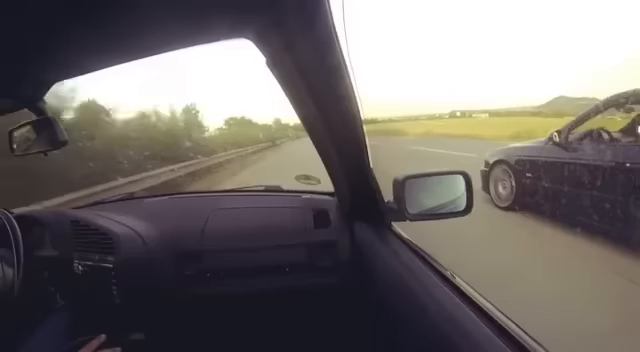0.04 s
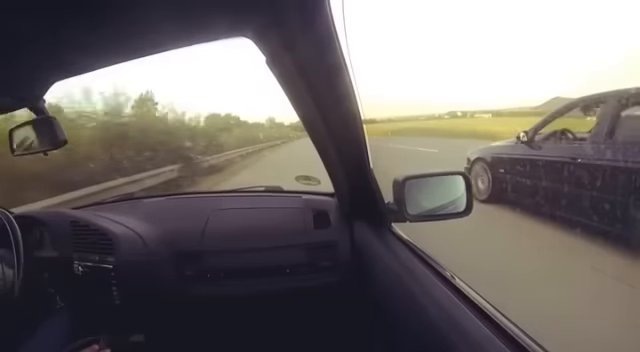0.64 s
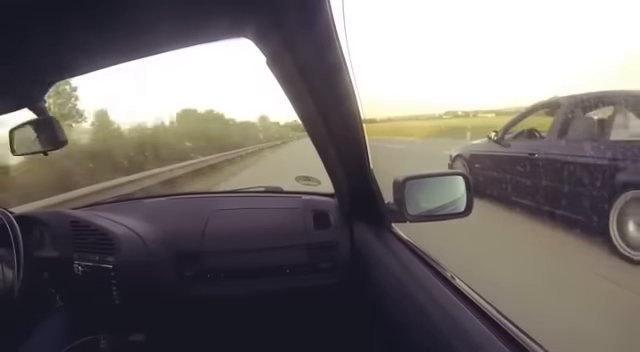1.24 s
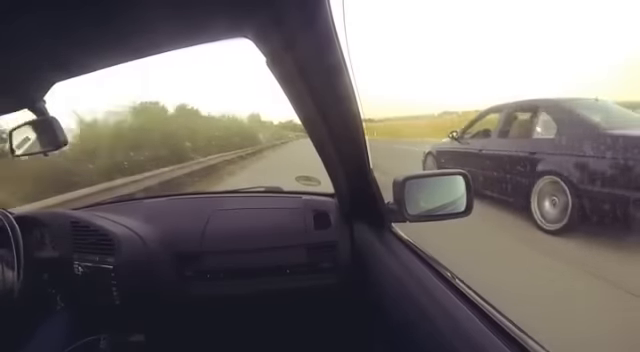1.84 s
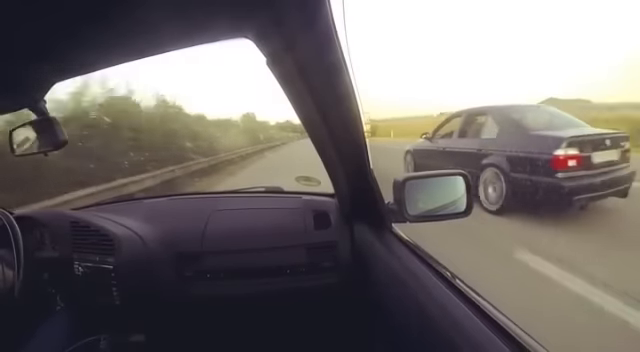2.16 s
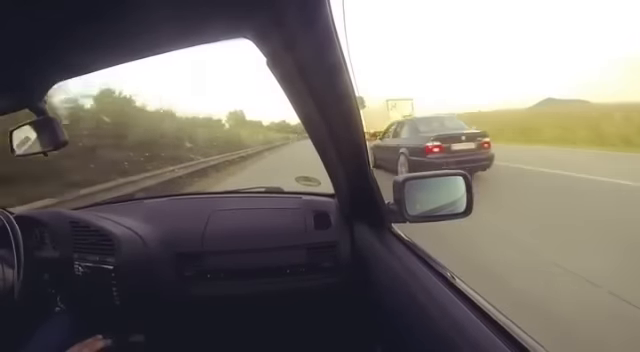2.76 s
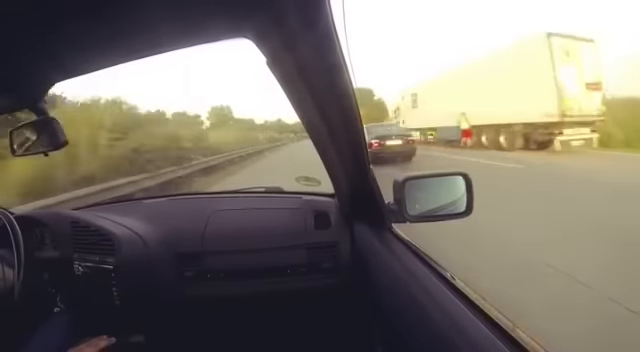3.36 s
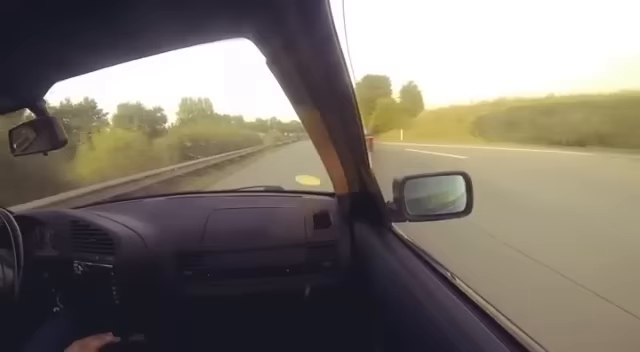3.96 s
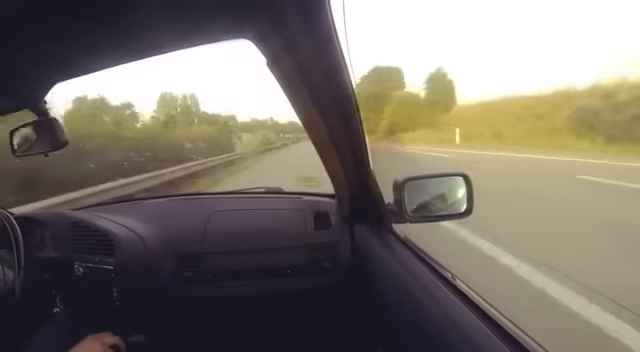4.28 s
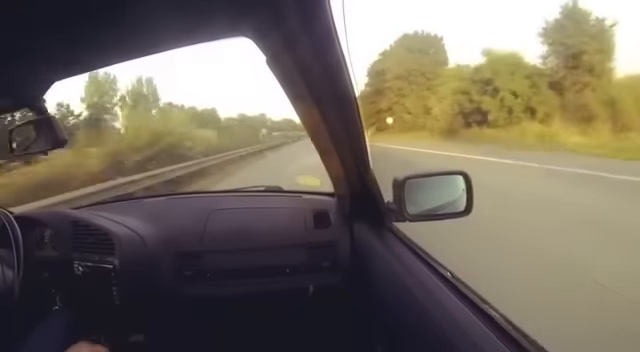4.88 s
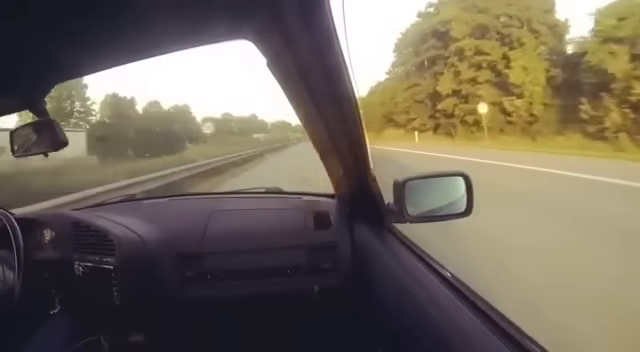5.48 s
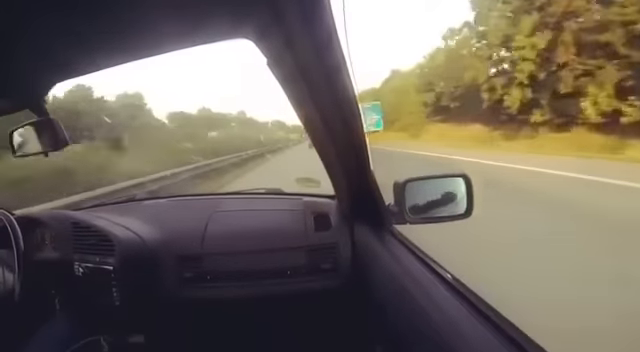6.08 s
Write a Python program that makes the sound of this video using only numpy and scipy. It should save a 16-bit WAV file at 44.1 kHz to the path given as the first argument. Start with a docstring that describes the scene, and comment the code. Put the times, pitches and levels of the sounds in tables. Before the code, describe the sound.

From the start, air throbs deeply through the open side window of a car at highway speed, with rushing wind, road rumble and a faint engine drone, all heard from the passenger seat. At about 0.7 seconds a V8 car in the next lane blips its throttle, then revs again at 1.3 as it changes down. From 1.7 it accelerates hard, its intake booming and rasping. It passes at around 2.5, and the sound turns into a howling, crackling exhaust, loudest near 3 seconds, climbing in pitch as it draws away. At about 4.5 it changes up with a dull pop, pulls once more until 5, then coasts as a distant hum. From 4.3 loose trim ticks lightly inside the cabin. Dull jolts of air thump near 0.4, 1.1, 5.3 and 5.7, and wind and rumble carry on to the end at about 6 seconds.

```python
"""Air throbs through the open side window of a car at highway speed, over road rumble and rushing wind.
A V8 in the next lane blips its throttle, changes down and pulls past: first its intake booms and rasps,
then its exhaust howls and crackles. Both are firing pulses and rough gas flow ringing in hollow spaces.
Far ahead it changes up, pulls once more and coasts, while loose trim ticks inside our car."""
import sys
import numpy as np
from scipy import signal
from scipy.fft import rfft, irfft, next_fast_len
from scipy.io import wavfile
from scipy.ndimage import uniform_filter1d

SR = 44100
rng = np.random.default_rng(int(sys.argv[2]) if len(sys.argv) > 2 else 0)


def put_to_file(sound):
    """Save the sound as 16-bit audio at rate SR, in the file named by the first command-line argument."""
    columns = np.atleast_2d(sound).T  # one column per channel
    safe = np.clip(columns, -1, 1)
    whole_steps = np.round(safe * 32767)
    wavfile.write(sys.argv[1], SR, whole_steps.astype(np.int16))


N = 269892
TIME = np.arange(N) / SR
FFT_SIZE = next_fast_len(N, True)
BIN_HZ = np.maximum(np.fft.rfftfreq(FFT_SIZE, 1 / SR), 1)
PAST_S = 2.46   # the V8's tail comes level with our window


def from_db(db):
    """Turn decibels into a gain to multiply by."""
    return 10 ** (np.asarray(db) / 20)


def rms_one(x):
    """Scale a signal so that its average level (rms) is 1."""
    return x / np.sqrt(np.mean(x ** 2) + 1e-20)


def in_time(rows):
    """Join (time, value) points with straight lines, giving a value for every sample."""
    return np.interp(TIME, *np.transpose(rows))


def turns_of(hz):
    """Count the cycles completed so far."""
    return np.cumsum(hz) / SR


def coloured(x, gain):
    """Give each frequency its own gain, then set the average level to 1."""
    return rms_one(irfft(rfft(x, FFT_SIZE) * gain, FFT_SIZE)[:N])


def resonant(x, modes):
    """Make a signal ring in narrow bands of pitch, called modes or resonances."""
    power = sum(from_db(db) ** 2 / (1 + ((BIN_HZ - hz) / (width / 2)) ** 2 / 2) ** 3
                for hz, width, db in modes)
    return coloured(x, np.sqrt(power))


def shaped(x, spectrum):
    """Filter with a smooth tone curve; nothing passes beyond its ends."""
    hz, db = np.transpose(spectrum)
    return coloured(x, from_db(np.interp(np.log(BIN_HZ), np.log(hz), db, left=-np.inf, right=-np.inf)))


def noise():
    """White noise: an even hiss."""
    return rng.standard_normal(N)


def drift(hz):
    """A random wander of typical size 1, mostly slower than hz."""
    return coloured(noise(), 1 / (1 + (BIN_HZ / hz) ** 2))


def evened(x):
    """Hold the short-term level at 1."""
    power = uniform_filter1d(uniform_filter1d(x ** 2, size=2400), size=2400)
    return x / np.sqrt(power + 1e-12)


def held(start_s, end_s, attack_s, release_s):
    """Rise to 1 from start_s, hold, and fall to 0 from end_s."""
    return np.clip(np.minimum((TIME - start_s) / attack_s, 1 - (TIME - end_s) / release_s), 0, 1)


def swell(centre_s, width_s):
    """A bell-shaped rise and fall of height 1."""
    return np.exp(-np.minimum(((TIME - centre_s) / width_s) ** 2, 50))


def knocks(events, spectrum, width_s, level_db):
    """Each knock is a brief, sharply peaked burst of filtered noise."""
    envelope = sum(from_db(db + level_db - 8.7 * np.minimum(np.abs(TIME - s - width_s) / width_s, 20))
                   for s, db in events)
    return envelope * shaped(noise(), spectrum)


def window_air():
    """The cabin breathes through the window like a blown bottle, and the wind flutters in step."""
    # how fast the air pumps in and out: (time [s], rate [Hz])
    throb_rate = [(0, 18.5), (1.3, 18.5), (2.8, 17.5), (3.4, 17), (4.4, 17.5), (5, 20), (6.12, 15.5)]
    # the throb, weaker while the other car is near: (time [s], relative level [dB])
    throb_level = [(0, -17.3), (1.25, -17.5), (1.85, -22.5), (2.7, -22), (3.6, -20), (4.1, -16.8),
                   (6.12, -17.6)]
    # rushing wind, with a lull: (time [s], relative level [dB])
    wind_level = [(0.09, -45), (.3, -42.5), (1.2, -42.3), (4.98, -44), (5.08, -47), (5.2, -44.5),
                  (5.28, -44.5), (5.34, -48.5), (5.48, -50), (5.62, -43.5), (5.8, -43.2), (6.12, -48.8)]
    # hollow resonances of the microphone's housing that colour the wind:
    # (pitch [Hz], width [Hz], relative level [dB])
    housing_modes = [(330.4, 143, -0.5), (413, 57, -1), (590, 80, -14), (600, 400, -14.5), (985, 180, -5.5),
                     (1400, 228, -10.5), (1550, 190, -5.5), (2276, 480, -18.5), (2986, 940, -25.3),
                     (4230, 600, -36.5), (4980, 590, -40), (6370, 1300, -46.5), (8050, 1600, -49),
                     (10400, 1900, -52)]
    swing = np.sin(2 * np.pi * turns_of(in_time(throb_rate) * (1 + .013 * drift(4))))
    throb = from_db(in_time(throb_level) + 4.5) * swing
    flutter_db = .72 * swing + 1.6 * drift(18)
    wind = from_db(in_time(wind_level) + 6.5 + flutter_db) * resonant(noise(), housing_modes)
    return throb + wind


def rolling(level, bumps, spectrum):
    """Low noise that wavers with the uneven road and swells at each bump."""
    surface = from_db(in_time(level) + 1.8 * drift(7))
    power = surface ** 2 + sum(from_db(db) ** 2 * swell(s, width_s=.06) for s, db in bumps)
    return np.sqrt(power) * evened(shaped(noise(), spectrum))


def road():
    """The road makes our car's body shudder and its cabin rumble."""
    # body shudder: (time [s], level [dB])
    shudder_level = [(0, -28), (1.1, -29), (3.4, -23.5), (4.7, -31), (6.12, -28)]
    # its very deep tone: (frequency [Hz], relative level [dB])
    shudder_tone = [(12, -20), (22, -1), (30, 1.5), (42, -2.5), (50, -10), (65, -31)]
    # cabin rumble, easing on smoother road: (time [s], level [dB])
    rumble_level = [(0, -30), (1.1, -26.5), (3.0, -27), (3.25, -29.5), (4.4, -29.5), (5.1, -31.5),
                    (6.12, -30)]
    # its low tone: (frequency [Hz], relative level [dB])
    rumble_tone = [(42, -18.5), (54, -5.5), (66, 4), (76, -4), (86, -19), (105, -15.5), (150, -24),
                   (210, -29), (300, -34.5), (600, -69)]
    # bumps in the road: (time [s], shudder [dB], rumble [dB])
    bumps = [(.44, -23, -24), (1.78, -23, -23), (2.62, -20, -27), (2.8, -32, -18.5), (3.05, -20, -25),
             (3.6, -21, -27), (5.05, -40, -29), (5.33, -18.5, -25.5), (5.7, -25, -26)]
    shudder = rolling(shudder_level, [(s, db) for s, db, _ in bumps], shudder_tone)
    rumble = rolling(rumble_level, [(s, db) for s, _, db in bumps], rumble_tone)
    return shudder + rumble


def own_engine():
    """Our own engine drones on one low, slowly moving note."""
    # the drone: (time [s], pitch [Hz], level [dB])
    drone = [(0, 132.7, -62.5), (2.4, 145.5, -45), (3, 148.3, -42), (4.7, 155.4, -41), (5, 157.9, -54),
             (6.12, 154.9, -47)]
    pitch = in_time([(s, hz) for s, hz, _ in drone])
    level_db = in_time([(s, db) for s, _, db in drone])
    return from_db(level_db) * np.sin(2 * np.pi * turns_of(pitch))


def electrical_whine(hz=10645):
    """A faint, very high tone that wavers in level."""
    return from_db(-79.5 + 2 * drift(3)) * np.sin(2 * np.pi * hz * TIME)


def tyres(fade_s=1.5):
    """The other car's tyres hiss beside us and fade once it is past."""
    # tyre hiss: (frequency [Hz], relative level [dB])
    tone = [(2000, -6), (3100, 0), (3700, -8), (4300, -3), (5200, -6), (6000, -12), (8200, -15),
            (12000, -28)]
    return from_db(-59.5) * np.clip(1 - (TIME - PAST_S) / fade_s, 0, 1) * shaped(noise(), tone)


def thumps():
    """Dull thumps: jolts of air, and one exhaust pop at the gear change."""
    # the thumps, with the pop at 4.474 s: (time [s], relative peak [dB])
    events = [(0.354, -23.5), (0.593, -33), (1.081, -24), (4.474, -29), (5.296, -17.5), (5.363, -20),
              (5.388, -31), (5.69, -25), (5.722, -22)]
    # their dull tone: (frequency [Hz], relative level [dB])
    tone = [(40, -10), (70, 0), (130, -2.5), (220, -16), (330, -3), (450, -20), (800, -37)]
    return knocks(events, tone, width_s=.0054, level_db=-3.5)


def firing(turns, spread, scatter_db=3, count=200):
    """Pressure from eight uneven cylinders; a spread under 1 bunches it into one beat a cycle."""
    # Orders are tones at whole multiples of the engine's cycle rate; order 8 is the firing rate.
    # the cylinders' pattern: (order [per cycle], relative level [dB])
    order_levels = [(1, -2.5), (3, 4), (4, 3), (6, -4), (7, -2), (8, 7), (9, 2.5), (10, -2), (11, 3),
                    (12, 4), (13, -1.5), (14, 0.5), (15, -12), (16, 6), (17, 4.5), (18, 3), (19, -3),
                    (20, 1), (21, 3), (22, -0.5), (24, -3.5), (25, 4.5), (26, -9.5), (27, -10.5), (28, 0.5),
                    (29, -1), (30, -3), (32, -2), (34, 1), (38, -2)]
    orders = np.arange(count)
    listed, db = np.transpose(order_levels)
    chance_db = rng.normal(0, 1, count) * scatter_db * (orders > listed[-1])
    sizes = from_db(np.interp(orders, listed, db) + chance_db) * (orders > 0)
    lags = spread * rng.random(count)
    lags[8] = 0   # the firing rate stays in step with the crankshaft
    cycle = rms_one(irfft(sizes * np.exp(2j * np.pi * lags), 20 * count))
    return np.interp(turns % 1, np.arange(len(cycle)) / len(cycle), cycle)


def gas_flow(turns, rough_db, throb_db, spread=1):
    """Firing pulses, plus the noise of swirling gas that surges with each cycle and each firing."""
    surge = from_db(throb_db * (np.cos(2 * np.pi * turns) + np.cos(16 * np.pi * turns)))
    shifting = sum(drift(8) * firing(turns, spread=1) for _ in range(2))   # no two cycles fire alike
    pulses = rms_one(firing(turns, spread) + from_db(-13) * rms_one(shifting))
    return pulses + from_db(rough_db + 1.5) * rms_one(surge * noise())


def passing_gains(turn_s=.12, shadow_db=-22.5):
    """Each part of the V8 grows louder as the throttle opens and as that part turns to face us."""
    # throttle presses: (opens [s], lifts [s], rise [s], fall [s], boom, hiss and spray [dB],
    # rasp, snarl and whistle [dB], exhaust [dB])
    throttle = [(.68, .83, .1, .1, 1.5, 1, 3), (1.23, 1.5, .16, .17, -2, -1.5, 0),
                (1.65, 4.2, .1, .07, 0, 0, 0), (4.39, 4.49, .05, .07, -5, -3, -8.5),
                (4.71, 5.0, .09, .06, -12, 6, -4.5), (5.1, 5.28, .05, .05, -18, 1, -16)]
    # when each named part faces us: (from [s], until [s], relative level [dB], rise [dB/s],
    # fall [dB/s], step once past [dB], share of flares and flutter [factor])
    facing = { "boom": (1.45, 2.27, -19.5, 17, 37, 0, .4), "rasp": (1.78, 2.0, -21, 24, 14, -11, .5),
              "snarl": (2.1, 2.27, -21.7, 15, 36, -8, .4), "whistle": (1.45, 2.3, -43, 18, 6, 0, .9),
              "pipe": (2.55, 3.0, -26.2, 11.5, 5.3, 1.5, .25), "howl": (2.85, 3.05, -25, 8.5, 10, 7, .25),
              "blare": (2.7, 3.35, -32.2, 14, 5.5, 0, .6), "crackle": (2.5, 2.85, -38.7, 17, 10, 1.5, .7),
              "spit": (2.65, 2.85, -37, 11, 17, 2, 1.0), "sizzle": (2.55, 2.8, -46.8, 15, 18.5, 2.5, 1.2),
              "hiss": (1.95, 2.3, -51.5, 6, 6, -5.5, .5), "spray": (2.4, 2.6, -54.6, 8.5, 11, -2, .7), }
    # brief flares and dips in level: (time [s], half width [s], change at a share of 1 [dB])
    flares = [(1.78, .03, 2), (1.88, .04, -3), (2.66, .025, 2.5), (2.8, .025, 7.5), (3.07, .035, 4.5),
              (3.16, .055, -10), (3.27, .03, 4), (3.47, .04, -6), (3.84, .02, 6), (4.482, .012, 16)]
    presses = [(held(*row[:4]), *row[4:]) for row in throttle]
    airbox = sum(from_db(db) * opening ** .9 for opening, db, _, _ in presses)
    air = sum(from_db(db) * opening ** 1.5 for opening, db, _, _ in presses)
    front = sum(from_db(db) * opening ** 1.5 for opening, _, db, _ in presses)
    rear = sum(from_db(db) * opening ** 1.5 for opening, _, _, db in presses)
    drive = dict(boom=airbox, hiss=air, spray=air, rasp=front, snarl=front, whistle=front,
                 pipe=rear, howl=rear, blare=rear, crackle=rear, spit=rear, sizzle=rear)
    past = np.clip((TIME - PAST_S) / turn_s, 0, 1)
    lorry_db = 3.5 * swell(3.71, width_s=.16)   # the side of a lorry throws the sound back
    flare_db = sum(db * swell(s, width) for s, width, db in flares)
    gains = {}
    for part, (start, end, level_db, rise, fall, step_db, share) in facing.items():
        away_db = -rise * np.maximum(start - TIME, 0) - fall * np.maximum(TIME - end, 0)
        if part in ("boom", "rasp", "snarl"):   # still heard when the car's body hides the intake
            away_db = np.maximum(away_db, shadow_db)
        uneven_db = share * (flare_db + 1.1 * drift(16))
        gains[part] = drive[part] * from_db(level_db + away_db + step_db * past + lorry_db + uneven_db)
    return gains


def intake(turns, rough_db, gain):
    """Gulps of air make the air filter box boom and the throttles rasp, snarl and whistle."""
    # resonances of the box and the throttles: (pitch [Hz], width [Hz], relative level [dB])
    boom_modes = [(366, 56, 0.5), (296, 70, -7), (430, 71, -9.5), (140, 40, -25)]
    rasp_modes = [(1617, 118, 0), (1745, 115, -12), (930, 130, -17), (750, 80, -19)]
    snarl_modes = [(1465, 125, 0), (1290, 130, -15)]
    whistle_modes = [(2230, 230, 0)]
    box_flow = gas_flow(turns, rough_db - 6.5, throb_db=6)
    out = from_db(1.2) * gain["boom"] * evened(resonant(box_flow, boom_modes))
    gulps = gas_flow(turns, rough_db + 2, throb_db=.5)
    for part, modes in dict(rasp=rasp_modes, snarl=snarl_modes, whistle=whistle_modes).items():
        out += gain[part] * evened(resonant(gulps, modes))
    return out


def with_echo(x, echo_db, lag_s, growth):
    """An echo whose path grows as the car draws away makes the engine's tones swell and fade."""
    return x + from_db(echo_db) * np.interp(TIME - lag_s - growth * TIME, TIME, x)


def exhaust(turns, rough_db, gain):
    """Pulses ring the pipes into low notes, a howl and a blare; the outlets crackle, spit and sizzle."""
    # resonances of the pipes and outlets: (pitch [Hz], width [Hz], relative level [dB])
    pipe_modes = [(160.6, 106, -19.5), (322, 49.9, -3), (468.3, 36.5, -4), (543, 72, -10.5),
                  (610, 57, -1.5), (704, 30, -4)]
    howl_modes = [(770, 60, -9.5), (852, 117, 0), (925, 140, 3), (1058, 101, -2), (1190, 160, -19)]
    blare_modes = [(1413, 130, -1.5), (1555, 140, 0), (1827, 140, -19)]
    crackle_modes = [(2120, 90, -1), (2350, 130, 1), (2574, 120, -1)]
    spit_modes = [(2800, 150, -2), (2990, 140, 2.5), (3290, 190, 2.5)]
    sizzle_modes = [(3720, 300, -5), (4130, 300, -1), (4360, 300, 0), (5050, 380, -16)]
    pulses = gas_flow(turns, rough_db + 1, throb_db=4, spread=.62)
    pulses = with_echo(pulses, echo_db=-11, lag_s=.00389, growth=.001534)
    outlet = gas_flow(turns, rough_db + 6.5, throb_db=3.5)
    outlet = with_echo(outlet, echo_db=-4, lag_s=.003, growth=.0009)
    jet = gas_flow(turns, rough_db + 11.5, throb_db=3.5)
    fizz = gas_flow(turns, rough_db + 12, throb_db=-2)
    return (from_db(1.36) * gain["pipe"] * evened(resonant(pulses, pipe_modes))
            + from_db(-.9) * gain["howl"] * evened(resonant(pulses, howl_modes))
            + gain["blare"] * evened(resonant(outlet, blare_modes))
            + gain["crackle"] * evened(resonant(jet, crackle_modes))
            + gain["spit"] * evened(resonant(jet, spit_modes))
            + gain["sizzle"] * evened(resonant(fizz, sizzle_modes)))


def gas_hiss(jet, gain):
    """Fast gas hisses, with a finer, higher spray of noise on top."""
    # tone of the hiss and the spray: (frequency [Hz], relative level [dB])
    hiss_tone = [(1900, -13.5), (3900, -10), (5100, 0), (6200, -5), (7200, -16), (8500, -34)]
    spray_tone = [(6500, -14), (7500, -6), (8200, 0), (8800, -5), (9300, -8), (12000, -10.5),
                  (13000, -15.5), (14000, -11), (15500, -30.5)]
    hiss = from_db(1.9) * gain["hiss"] * evened(shaped(jet, hiss_tone))
    spray = from_db(-.4) * gain["spray"] * evened(shaped(jet, spray_tone))
    return hiss + spray


def frayed(turns):
    """Slightly unsteady timing roughens a clean engine tone."""
    return turns + .003 * drift(35)


def singing(turns, gain, floor_db=-9):
    """Single orders sing out as they meet a resonance; return them and the gain each part has left."""
    # the sung notes: (part [name], order [per cycle], starts [s], fades [s], level [dB])
    notes = [("boom", 8, .73, .8, -30.5), ("pipe", 16, .73, .78, -37), ("boom", 8, 1.36, 1.46, -24),
             ("snarl", 31, 1.8, 1.93, -26), ("rasp", 35, 1.82, 1.93, -21), ("snarl", 30, 2.03, 2.2, -24),
             ("howl", 16, 2.14, 2.24, -26), ("howl", 20, 2.36, 2.76, -18.5), ("blare", 27, 2.3, 2.55, -35),
             ("blare", 28, 2.92, 3.1, -29), ("blare", 30, 3.0, 3.08, -33), ("blare", 30, 3.25, 3.4, -33),
             ("crackle", 45, 2.92, 3.03, -37), ("spit", 61, 2.9, 3.0, -39), ("blare", 28, 3.6, 3.69, -29),
             ("blare", 25, 3.95, 4.12, -38), ("rasp", 36, 4.75, 4.93, -38)]
    tones = 0
    power_left = {part: g ** 2 for part, g in gain.items()}
    for part, order, start, end, db in notes:
        height = from_db(db + 1.2 * drift(12)) * held(start, end, attack_s=.08, release_s=.14)
        tones += height * np.cos(2 * np.pi * order * frayed(turns))
        power_left[part] -= height ** 2 / 2
    return tones, {part: np.sqrt(np.maximum(power_left[part], (from_db(floor_db) * g) ** 2))
                   for part, g in gain.items()}


def ringing_hiss(jet):
    """The hiss rings at sliding pitches as the outlets swing past."""
    # the rings: (time [s], half width [s], pitch [Hz], glide [Hz/s], width [Hz], level [dB])
    rings = [(1.78, .07, 5200, 200, 700, -55), (2.05, .16, 5450, 1500, 1000, -49.5),
             (2.33, .16, 6200, 800, 500, -48.5), (2.4, .13, 8200, 2200, 800, -53.5),
             (2.73, .12, 8000, -1200, 800, -53)]
    out = 0
    for s, width_s, hz, glide, width_hz, db in rings:
        band = signal.hilbert(resonant(jet, [(hz, width_hz, 0)]), next_fast_len(N))[:N]
        slide = np.exp(1j * np.pi * glide * (TIME - s) ** 2)   # shifts the whole band in pitch
        out += from_db(db) * swell(s, width_s) * np.real(band * slide)
    return out


def trim_ticks(faint_from_s=4.4, faint_count=24):
    """Loose trim ticks, with fainter ticks at random moments among the loud ones."""
    # the loudest ticks: (time [s], relative peak [dB])
    loud = [(4.3127, -42.5), (4.4767, -42), (4.5462, -43.5), (4.6025, -39), (4.6284, -45), (4.7132, -46),
            (4.7415, -47), (4.8001, -44), (4.8792, -44), (5.017, -48), (5.0794, -45), (5.2965, -39.5),
            (5.3642, -38.5), (5.3906, -38), (5.4365, -47.5), (5.722, -39.5), (5.7812, -45), (5.8346, -45),
            (5.8636, -44.5), (5.8875, -46), (5.9455, -46), (5.9703, -47), (6.0526, -43.5)]
    # tone of a tick: (frequency [Hz], relative level [dB])
    tone = [(300, 2), (1500, 5), (3000, -4.5), (5000, -10.5), (8200, -18.5), (9200, -18.5), (14000, -34)]
    faint = [(rng.uniform(faint_from_s, TIME[-1]), rng.uniform(-57, -51)) for _ in range(faint_count)]
    return knocks(list(loud) + faint, tone, width_s=.0014, level_db=3)


def far_hum(turns):
    """Far ahead, the V8 is a hum of a few wavering orders."""
    # the hum, pulling and then coasting: (time [s], relative level [dB])
    level = [(4.7, -70), (4.8, -42.5), (5.01, -40.5), (5.07, -58), (5.17, -50), (5.47, -51), (5.64, -41),
             (6.12, -46)]
    # its tones: (order [per cycle], relative level [dB])
    orders = [(8, 1.5), (11, -9), (12, -15), (13, -7.5), (14, -4.5), (15, -15), (16, -2), (20, -13),
              (21, -8)]
    hum = sum(from_db(db + 2.8 * drift(6)) * np.sin(2 * np.pi * order * frayed(turns))
              for order, db in orders)
    return from_db(in_time(level) + 6) * rms_one(hum)


def v8():
    """One crankshaft sets the pace for all the sounds of the passing engine."""
    # engine speed: change down, long pull, change up: (time [s], four-stroke cycles [per s])
    speed = [(0, 37), (.72, 37.8), (.79, 36.4), (.87, 38), (1.35, 37.6), (1.45, 47), (1.51, 46.8),
             (1.58, 43.3), (1.64, 43), (1.7, 47.5), (1.76, 46.8), (1.82, 45), (2, 47), (2.1, 47.1),
             (2.2, 47.6), (2.4, 48.9), (2.5, 49.1), (2.9, 51.3), (3.1, 52.2), (3.9, 56.3), (4.25, 57.7),
             (4.7, 42.2), (5, 42.4), (5.4, 41.4), (5.6, 41.4), (6.12, 40.9)]
    # ragged while revving freely, clean under load: (time [s], relative noise level [dB])
    roughness = [(0, 4), (.8, 1), (1.45, 0), (1.75, -5.5), (2.3, -11.5), (3.3, -8.5), (3.75, -3.5),
                 (4.2, -5.5), (4.35, 5), (4.8, -2)]
    turns = turns_of(in_time(speed) * (1 + .0016 * drift(25)))   # crank jitter blurs the high orders
    rough_db = in_time(roughness)
    tones, gain = singing(turns, passing_gains())
    jet = gas_flow(turns, rough_db + 17, throb_db=1.5)
    return (intake(turns, rough_db, gain) + exhaust(turns, rough_db, gain) + gas_hiss(jet, gain)
            + tones + ringing_hiss(jet) + far_hum(turns))


def scene():
    """Everything as heard from the passenger seat, in one channel."""
    background = window_air() + road() + own_engine() + electrical_whine() + tyres()
    return (background + thumps() + v8() + trim_ticks())[None]


def record(dry, start_s=.084, cutoff_hz=15650):
    """The sound takes on a hollow colour, opens after a moment of silence and loses its top treble."""
    # peaks and dips in the treble at the microphone: (pitch [Hz], width [Hz], change [dB])
    hollow = [(3600, 200, -3.5), (3960, 140, -3.5), (4320, 220, 2.5), (4730, 240, -9), (5030, 260, 3.5),
              (5660, 380, -4.5), (6180, 320, 3), (7250, 500, -2.5), (8550, 400, 2), (9200, 550, -6)]
    for hz, width_hz, db in hollow:
        b, a = signal.iirpeak(hz, hz / width_hz, fs=SR)
        dry = dry + (from_db(db) - 1) * signal.lfilter(b, a, dry)
    fade_in = np.clip((TIME - start_s) / .004, 0, 1)
    low_pass = signal.ellip(10, .1, 90, cutoff_hz, fs=SR, output="sos")
    return signal.sosfilt(low_pass, dry * fade_in)


dry = scene()
out = record(dry)
put_to_file(out)
```